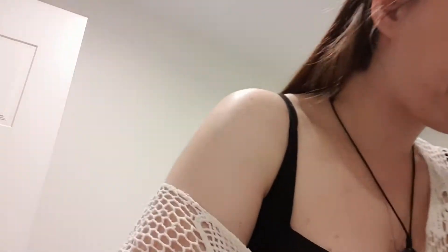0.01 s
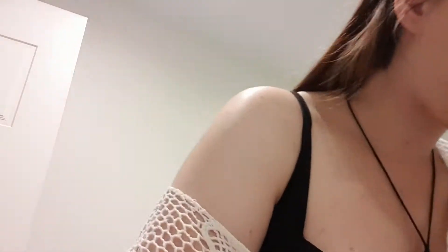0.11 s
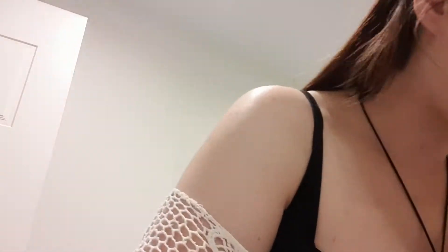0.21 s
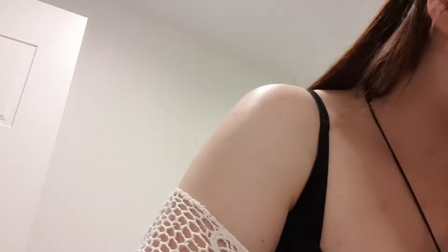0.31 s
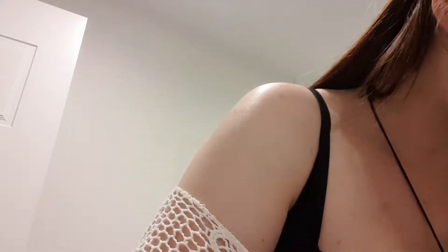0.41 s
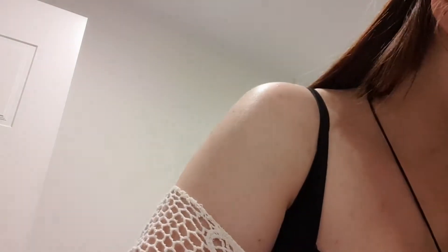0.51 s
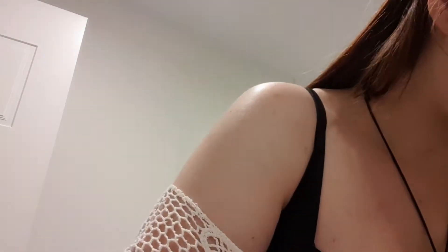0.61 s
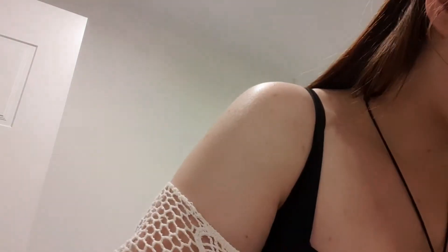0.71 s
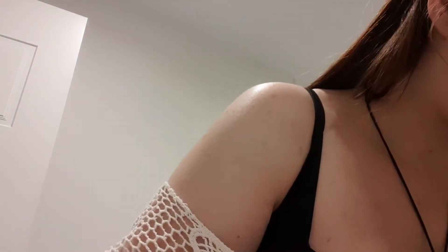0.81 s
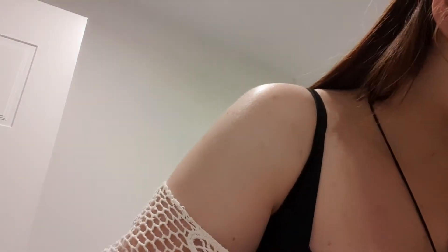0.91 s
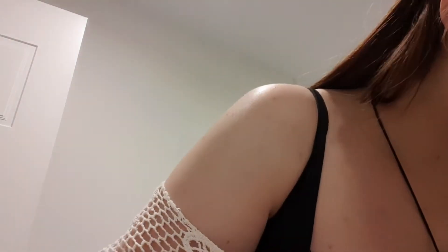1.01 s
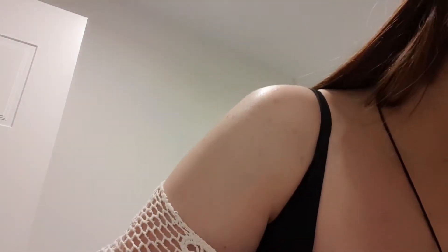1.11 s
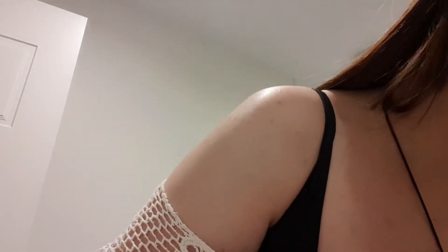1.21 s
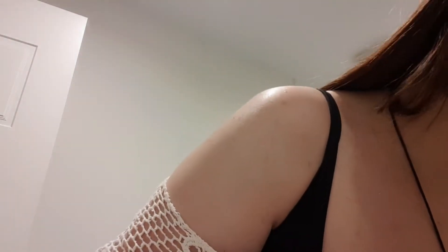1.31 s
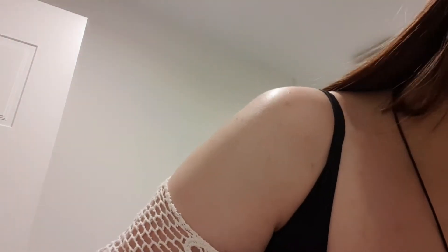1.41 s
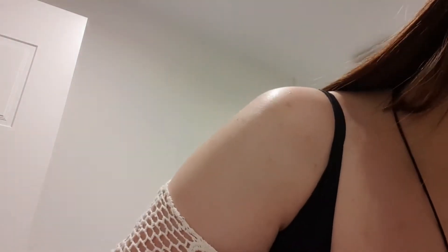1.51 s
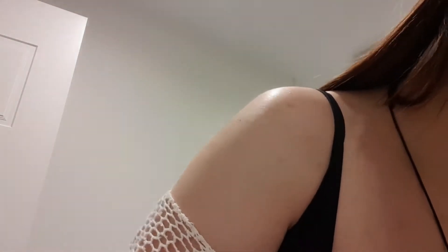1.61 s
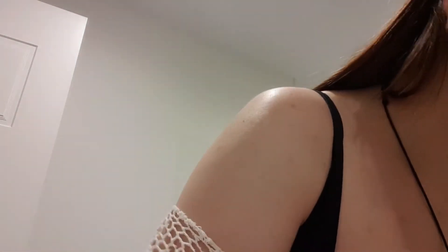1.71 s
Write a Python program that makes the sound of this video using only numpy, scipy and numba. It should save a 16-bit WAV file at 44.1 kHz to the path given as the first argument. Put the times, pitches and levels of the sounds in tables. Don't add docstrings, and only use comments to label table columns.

```python
import sys
import numpy as np
from scipy import signal
from scipy.fft import rfft, irfft
from scipy.io import wavfile
from scipy.ndimage import uniform_filter1d
from numba import njit

SR = 44100
rng = np.random.default_rng(int(sys.argv[2]) if len(sys.argv) > 2 else 0)


def how_loud(loudness_db):
    steps = np.asarray(loudness_db, float) / 20
    return 10 ** steps


def log_audio(samples):
    frames = np.atleast_2d(samples).T
    limited = np.clip(frames, -1, 1)
    pcm = np.round(limited * 32767).astype(np.int16)
    wavfile.write(sys.argv[1], SR, pcm)


N = 79380
T = np.arange(N) / SR


def noise():
    return rng.standard_normal(N)


def unit(x):
    return x / np.sqrt(np.mean(x ** 2))


def curve(rows, column=1, off=-120):
    rows = np.array(rows)
    return np.interp(T, rows[:, 0], rows[:, column], left=off, right=off)


def colour(x, points, share=1):
    hz = np.arange(N // 2 + 1) * SR / N + 1
    point_hz, point_db = np.array(points).T
    gain_db = np.interp(np.log(hz), np.log(point_hz), point_db)
    return irfft(rfft(x) * how_loud(share * gain_db), N)


def ring(x, modes):
    out = 0
    for hz, db, t60 in modes:
        pole = np.exp(2j * np.pi * hz / SR - np.log(1000) / (t60 * SR))
        out = out + how_loud(db) * signal.lfilter([1], [1, -pole], x).imag
    return out


def walk(rate):
    hold = int(SR / rate)
    steps = np.repeat(rng.standard_normal(N // hold + 1), hold)
    return unit(uniform_filter1d(steps, hold)[:N])


def burst(start, length, attack, release):
    rise = np.clip((T - start) / attack, 0, 1)
    return rise * np.exp(-np.clip(T - start - length, 0, None) / release)


@njit
def highpass(x, hz, damp):
    y, b, l = np.empty(len(x)), 0., 0.
    for i in range(len(x)):
        g = np.tan(np.pi * hz[i] / SR)
        v = (b + g * (x[i] - l)) / (1 + g * (g + damp))
        low = l + g * v
        y[i] = x[i] - damp * v - low
        b, l = 2 * v - b, 2 * low - l
    return y


@njit
def grains(start, hz, cycles, size, glide, n):
    y = np.zeros(n)
    for k in range(len(hz)):
        phase, length = 0., cycles[k] * SR / hz[k]
        for i in range(min(int(4 * length), n - int(start[k]))):
            phase += 2 * np.pi * min(hz[k] * (1 + glide * i / length), 20000.) / SR
            attack = min(i / (.15 * length + 1), 1.)
            y[int(start[k]) + i] += size[k] * np.sin(phase) * np.exp(-i / length) * attack
    return y


def fizz(count, low_hz, high_hz, cycles, spread_db):
    place, pitch, length, size = rng.random((count, 4)).T
    hz = low_hz * (high_hz / low_hz) ** pitch
    return unit(grains(place * (N - 1), hz, cycles * (.5 + length), how_loud(spread_db * size) * np.sqrt(hz), 0.054, N))


def water(points, bubbles, flicker_db, cycles):
    grain = fizz(count=6000, low_hz=810.0, high_hz=14490.0, cycles=cycles, spread_db=14.5)
    return unit(colour(noise() + bubbles * grain, points)) * how_loud(flicker_db * walk(60))


def pair(points):
    apart = [(200, -15), (1500, 0.5)]
    common = colour(noise(), points)
    difference = colour(colour(noise(), points), apart)
    return unit(common + difference * np.array([[1], [-1]]))


def background():
    # (frequency [Hz], level [dB per Hz])
    room_tone = [(45, -8), (250, -16.5), (1300, -23), (2400, -32), (3200, -29), (5100, -30), (5700, -23.5),
                 (7500, -32.5), (16000, -48)]
    # (frequency [Hz], level [dB per Hz])
    earlier = [(40, 2.5), (62, 15), (110, 2.5), (250, 6), (630, 12), (900, -5), (1290, 2.5), (1700, 2.5),
               (2000, -26), (16000, -64)]
    # (time [s], background gain [dB])
    hush = [(0, 2.5), (.06, 1), (.19, -5), (.26, -8), (.55, -13), (.7, -9), (1.0, -8.5), (1.16, -25.5),
            (1.3, -13.5), (1.45, -18), (1.65, -27.5), (1.8, -30.5)]
    tone = pair(room_tone) * how_loud(-49 + 3.3 * walk(12))
    hum = unit(ring(noise(), [(61, 0, 0.98)])) * how_loud(-46.5 - 5.5 * T)
    fan = unit(ring(noise(), [(2500, 0, .06)])) * how_loud(-68.5)
    knock_tail = pair(earlier) * how_loud(-41 - 60 * T / 0.3)
    return (tone + hum + fan) * how_loud(curve(hush)) + knock_tail


def basin():
    # (time [s], level [dB])
    drum = [(0.0, -42), (0.204, -55.5), (0.406, -48), (0.476, -37.5), (0.54, -38), (0.62, -31.5),
            (0.676, -35), (0.696, -30), (1.002, -55.5), (1.036, -44), (1.162, -58), (1.252, -38),
            (1.382, -53), (1.438, -46), (1.728, -74.5), (1.8, -76.5)]
    # (frequency [Hz], level [dB], t60 [s])
    modes = [(144, 1.5, 0.12), (167.1, 4.5, 0.16), (196, -5.5, 0.29), (252.9, 4.5, 0.2), (290, 1.5, .2),
             (327.1, -9, 0.44), (400.3, -15.5, 0.26), (576.4, -10, 0.13), (624.6, -11, 0.33)]
    # (time [s], peak [dB], push length [ms])
    lumps = [(.002, -37, 2), (.040, -41, 1.8), (.115, -39, 2), (.457, -36.5, 2.7), (.500, -35, 2),
             (0.59, -28.5, 2), (.600, -26, 2.5), (.621, -26, 2.73), (.632, -27.5, 2), (.695, -26.5, 2.5),
             (.705, -25, 3.3), (0.754, -34, 2.5), (.776, -27, 2.8), (.845, -37.5, 2.5), (1.221, -40, 2.2),
             (1.237, -37, 1.4), (1.2492, -35.5, 1.2), (1.2613, -41, 1.4), (1.27, -41.5, 1.4),
             (1.285, -41.5, 1.4), (1.293, -40, 1.5), (1.318, -44.5, 1.4), (1.404, -48.5, 2.1),
             (1.432, -39.5, 2.3), (1.453, -44.5, 1.6)]
    # (frequency [Hz], level [dB])
    wet_basin = [(100, 0.5), (170, -9), (330, -2.5), (450, 9.5), (900, -13.5)]
    wet_from_s = 0.98
    thin = [(60, -25.5), (135, -1.5)]
    patter = noise() * how_loud(0.89 * walk(70))
    out = unit(colour(ring(patter, modes), thin)) * how_loud(curve(drum) - 3.0)
    push = np.zeros(N)
    for s, db, ms in lumps:
        blow = np.hanning(int(ms * SR / 1000))
        push[int(s * SR):int(s * SR) + len(blow)] += how_loud(db) * blow / blow.sum()
    loaded = [(hz, db, 0.54 * t60) for hz, db, t60 in modes]
    out = out + 0.4 * colour(ring(push, loaded), thin)
    return np.where(T < wet_from_s, out, colour(out, wet_basin))


def ticks():
    # (time [s], level [dB], centre [Hz], width [Hz], decay [ms])
    spray = [(.1340, -46.5, 13400, 4900, 2.7), (.1920, -60, 7900, 2500, 12), (.8230, -37, 12000, 7000, 1.6),
             (0.834, -31, 10970, 2500, 3.8), (.8344, -38, 12200, 9030, 1.5), (.9400, -53, 12000, 6000, 2.6),
             (0.952, -47.5, 1410, 1400, 42), (.9700, -41, 14880, 4000, 2), (0.994, -43.5, 4574, 4995, 2.9),
             (1.4957, -47.5, 6407, 4000, 2.7), (1.4946, -52, 12300, 8730, 1.2),
             (1.4950, -65.5, 4230, 3000, 36)]
    out, crackle = 0, noise()
    for s, db, hz, width_hz, ms in spray:
        band = unit(colour(crackle, [(max(hz - width_hz, 300), -20), (hz, 0), (hz + width_hz, -20)]))
        out = out + how_loud(db) * band * burst(s, 0, .0003, ms / 1000)
    return out


def jet():
    # (time [s], level [dB], lowest hiss resonance [Hz])
    flow = [
        (.188, -64, 9000),
        (.208, -51.5, 6920),
        (.222, -31.5, 5200),
        (.25, -25, 4700),
        (.28, -25, 2800),
        (.40, -25, 2400),
        (.56, -24, 2800),
        (.62, -37.5, 3200),
        (.68, -42, 3235),
    ]
    # (frequency [Hz], level [dB per Hz])
    hiss_colour = [(290, -24.5), (600, -14), (1700, -9), (2900, -9.5), (4500, -4), (7000, 0), (12000, -3),
                   (16000, -10.5)]
    edge = np.clip(curve(flow, column=2, off=6000), 200, 15000)
    hiss = water(hiss_colour, bubbles=0.8, flicker_db=1.04, cycles=3.5)
    rush = highpass(hiss[::-1].copy(), 0.3 * edge, 1.25)
    resonant = highpass(hiss, 1.04 * edge, 0.67)
    narrow = highpass(resonant, .8 * edge, 1.41)
    return (0.78 * narrow + .5 * rush) * how_loud(curve(flow))


def lips():
    narrow = [(5800, 0, .0025)]
    whistle = unit(ring(ring(noise(), narrow), narrow))
    return how_loud(-32.5) * whistle * burst(.213, .03, 0.0056, 0.011)


def drops():
    # (time [s], peak [dB], pitch [Hz], length [cycles])
    single = [(.4700, -27, 2600, 7.4), (0.497, -23, 3930, 16), (.5270, -27, 4030, 9),
              (.5520, -20, 7600, 18), (.5530, -22, 4940, 21), (0.586, -22, 4130, 14), (0.6, -20.5, 4700, 4),
              (.6260, -25.5, 3670, 17), (.6320, -26.5, 3470, 10), (.6380, -23.5, 4225, 6),
              (.6500, -27, 2780, 13), (.6510, -28, 3730, 12), (0.6728, -18.5, 2370, 13),
              (.6755, -18, 2524, 11), (.6760, -17, 3670, 7.1), (.6790, -13.5, 3495, 6.9),
              (.6770, -27.5, 6800, 17), (.6840, -27.5, 2490, 14), (.6890, -28.5, 3470, 7.2),
              (.6920, -25, 4840, 13), (.7060, -24, 4774, 16), (.7100, -19.5, 2263, 9.9),
              (.7110, -18.5, 3684, 23), (.7130, -27, 5950, 14), (0.717, -27.5, 3850, 13),
              (.7200, -19, 4660, 9), (.7280, -26.5, 4960, 12), (.7330, -31, 3360, 9),
              (.7380, -26.5, 4830, 12), (0.738, -36.5, 1054, 22), (.7480, -30.5, 7800, 13),
              (.7500, -26.5, 3410, 15), (.7570, -34, 3590, 16), (0.781, -26, 7500, 14),
              (.7960, -30.5, 5000, 12.4), (1.2210, -50, 2600, 9), (1.2285, -33.5, 3830, 9.6),
              (1.2290, -39, 2280, 7), (1.2430, -42, 2600, 10), (1.2890, -45, 3900, 13),
              (1.289, -50, 7500, 18), (1.3210, -52, 2400, 12), (1.4950, -45, 3240, 4.7)]
    s, db, hz, cycles = np.array(single, float).T
    return grains(s * SR, hz, 0.64 * cycles, how_loud(db), 0.012, N) * how_loud(2.5 * walk(500))


def spatter():
    # (time [s], level [dB])
    splash = [
        [(.59, -34), (.665, -34), (.682, -30.5), (.74, -28.5), (.775, -35.5), (.85, -43.5), (.918, -55.5),
         (.972, -54.5), (1.16, -101.5)],
        [(1.222, -77), (1.234, -43), (1.292, -50.5), (1.345, -63), (1.39, -79), (1.48, -103), (1.497, -61.5),
         (1.55, -77), (1.62, -97.5)],
    ]
    # (frequency [Hz], level [dB per Hz])
    first_colour = [(400, -17.5), (598, -11), (1000, -15.5), (1650, -13), (2400, -11.5), (3700, -1),
                    (7500, -1.5), (16000, -12.5)]
    last_colour = [(400, -12.5), (900, -15.5), (1500, -15.5), (2600, -20), (3200, -18.5), (3900, -10),
                   (6000, -12), (16000, -19)]
    # (frequency [Hz], level [dB], t60 [s])
    glaze = [(2388, -1.5, .02), (3580, -2, 0.0097), (4920, -1.5, .015), (7500, -3, .015)]
    wet_glaze = [(1410, -8.5, .03), (2600, -6.5, .02), (3840, -1, 0.03), (5120, -1, 0.023),
                 (7500, -4.5, 0.024)]
    first = water(first_colour, bubbles=1.3, flicker_db=2.5, cycles=5.3)
    last = water(last_colour, bubbles=0.71, flicker_db=3.0, cycles=4.)
    first = first + 0.25 * unit(ring(first, glaze))
    last = last + 0.44 * unit(ring(last, wet_glaze))
    return first * how_loud(curve(splash[0]) - 1.0) + last * how_loud(curve(splash[1]) - 1.9)


def bowl():
    # (frequency [Hz], level [dB], t60 [s])
    modes = [(560.4, -1.5, .14), (628, -4, 0.14), (1032, 1.5, 0.1)]
    return how_loud(-45) * unit(ring(noise(), modes)) * burst(.728, 0.018, 0.0098, 0.12)


def drain():
    pitch_hz = 253 * (1 + 0.012 * walk(43.2))
    tone = np.sin(2 * np.pi * np.cumsum(pitch_hz) / SR) * how_loud(1.4 * walk(50))
    return how_loud(-41) * tone * burst(1.021, .052, 0.0065, 0.0064)


def handle():
    # (time [s], level [dB], held [ms])
    taps = [
        (1.179, -59.5, 12),
        (1.197, -57, 18),
        (1.794, -77, 20),
    ]
    # (frequency [Hz], level [dB], t60 [s])
    modes = [(118.9, 0.5, 0.09), (589, -2, 0.25), (1018, -3.5, 0.073), (1812, -7.5, 0.095),
             (2260, -22, .05), (4670, -28, .04), (7890, -28, .04)]
    out, rub = 0, noise() * how_loud(3.3 * walk(300))
    for s, db, ms in taps:
        held = burst(s, ms / 1000, 0.0032, 0.0097)
        click = np.exp(-.5 * ((T - s) / .00004) ** 2)
        out = out + ring(how_loud(db) * (click + 0.095 * rub * held), modes) * held
    return out


def echo(dry, t60):
    t = T[:SR // 2]
    tail = rng.standard_normal((2, len(t))) * how_loud(-60 * t / t60)
    tail = tail / np.sqrt(np.sum(tail ** 2, axis=1, keepdims=True))
    wet = np.array([signal.fftconvolve(dry, h)[:N] for h in tail])
    return signal.sosfilt(signal.butter(2, 400, "high", fs=SR, output="sos"), wet)


def scene():
    lag_s, shared = .00034, .45
    near = jet() + lips() + spatter()
    far = jet() + lips() + spatter()
    solid = basin() + drops() + ticks() + drain() + handle() + bowl()
    shaded = colour(solid, [(500, 0), (2500, -5.5)])
    left = near + solid
    right = np.interp(T - lag_s, T, shared * near + shaded) + np.sqrt(1 - shared ** 2) * far
    wet = how_loud(-3) * echo(left, t60=.3) * np.array([[.6], [.9]])
    return 0.99 * np.array([left, right]) + wet + background()


def low_pass(x):
    return signal.sosfilt(signal.butter(12, 16480, fs=SR, output="sos"), x)


def record(dry):
    # (frequency [Hz], level difference [dB])
    port_colour = [(60, 3), (300, 6), (1000, 6.5), (3000, 7), (5500, 9.5), (7800, 20), (11000, 7),
                   (15500, 23)]
    # (frequency [Hz], level [dB])
    mic = [(5000, 0.5), (5700, -1), (7900, -0.5), (8700, -7.5), (9500, -0.5), (11500, 3.5), (16000, 1.5)]
    heard = dry + how_loud(-83) * rng.standard_normal(dry.shape)
    left = colour(colour(heard[0], port_colour, share=0.31), mic)
    right = colour(colour(heard[1], port_colour, share=-0.84), mic)
    top_cut = signal.ellip(10, .2, 80, 15800, fs=SR, output="sos")
    return low_pass(signal.sosfilt(top_cut, np.array([left, right])))


dry = scene()
out = record(dry)
log_audio(out)
```